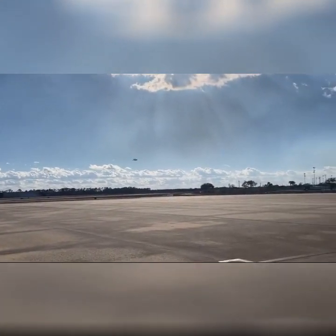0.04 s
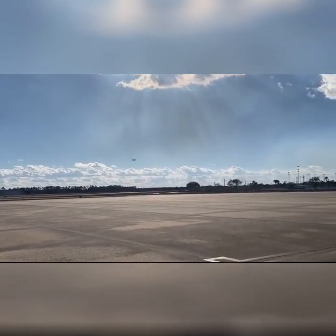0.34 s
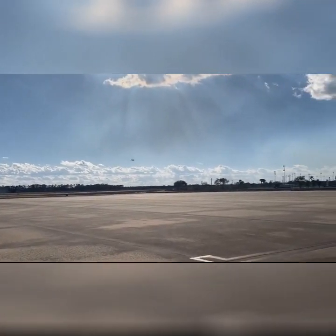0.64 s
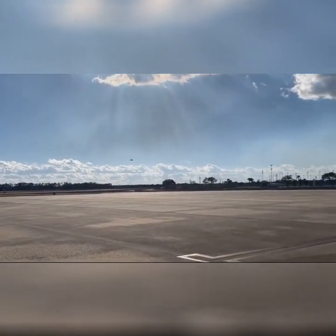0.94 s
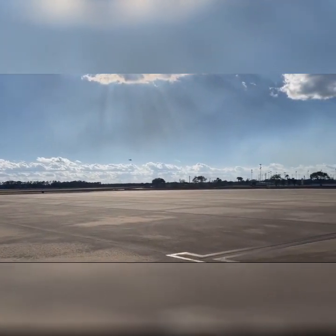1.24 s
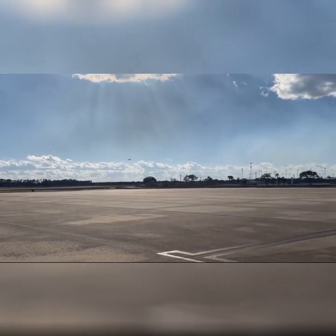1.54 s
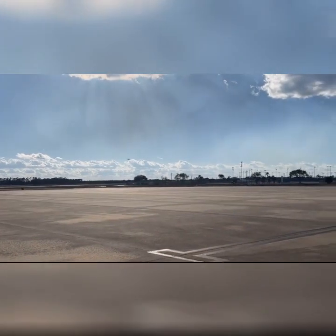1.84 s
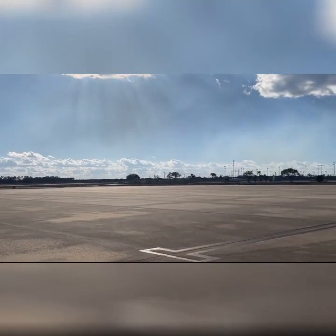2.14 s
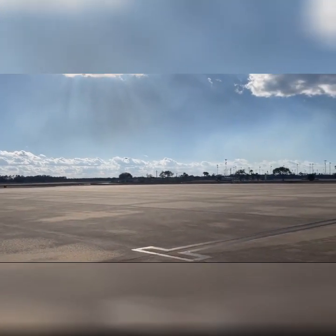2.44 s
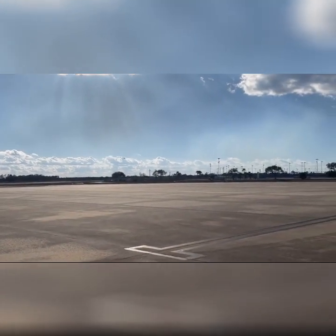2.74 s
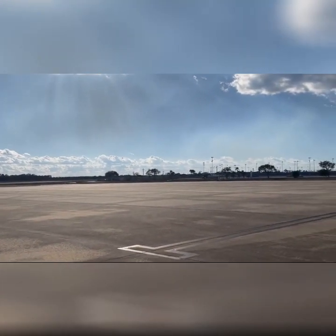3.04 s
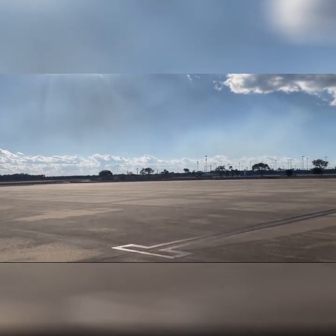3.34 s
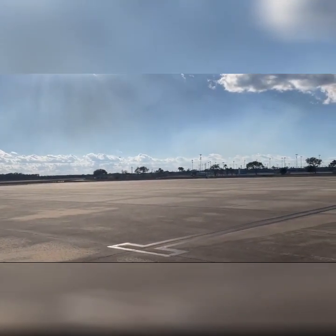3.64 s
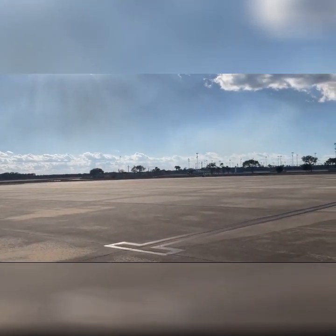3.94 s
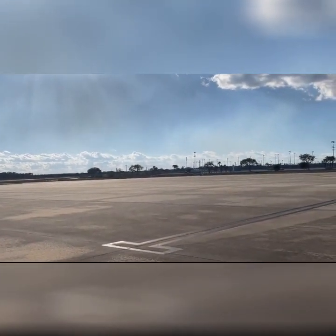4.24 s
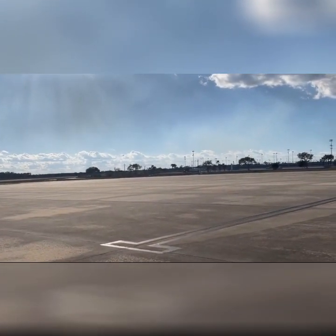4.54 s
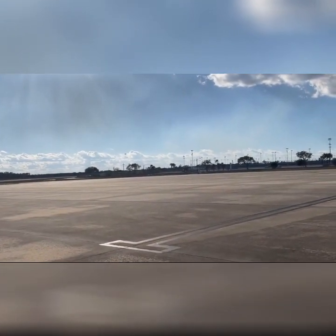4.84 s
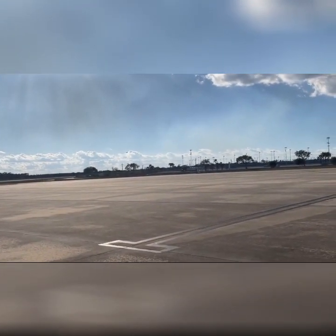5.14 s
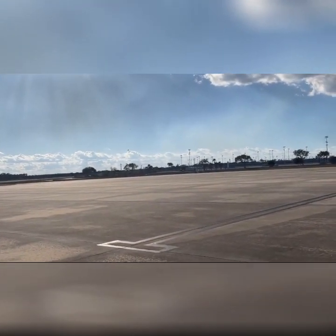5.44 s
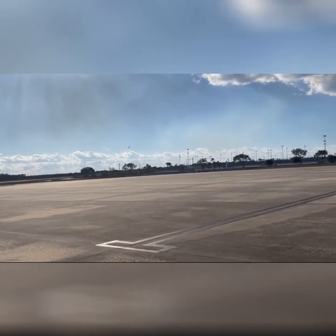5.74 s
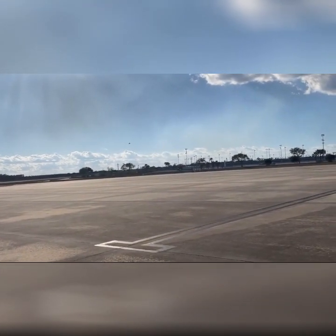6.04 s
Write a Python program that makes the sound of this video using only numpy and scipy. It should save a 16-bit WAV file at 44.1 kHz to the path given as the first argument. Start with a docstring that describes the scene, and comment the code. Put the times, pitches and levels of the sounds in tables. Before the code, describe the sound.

A jet fighter climbs away from an open airfield. Its exhaust makes a deep, throbbing boom and rumble, topped by rasping, tearing noise and sharp crackles that arrive in gusts. Brief hollow howls surface in the roar. After the first couple of seconds the crackle thins and the sound grows duller, while the low boom carries on. It is heard in stereo from the concrete apron.

```python
"""On the open concrete apron of an airfield, a jet fighter is heard climbing away.
Big swirls of air (eddies) in its exhaust boom, rumble and roar. Its pressure waves steepen into
shocks, sudden jumps in pressure that rasp, tear and crackle in gusts. Brief hollow howls stand out.
The air swallows more treble as the jet draws away, and the echo off the concrete cancels some
pitches, cutting wandering notches into the sound."""
import sys
import numpy as np
from scipy import signal
from scipy.fft import rfft, irfft
from scipy.io import wavfile
from scipy.ndimage import uniform_filter1d

SR = 44100
rng = np.random.default_rng(int(sys.argv[2]) if len(sys.argv) > 2 else 0)


def output_pcm(signal):
    """Save a mono or channel-first signal as 16-bit PCM at the path in sys.argv[1].

    Samples are clipped to [-1, 1] before scaling.
    """
    pcm = np.clip(np.atleast_2d(signal).T, -1, 1) * 32767
    wavfile.write(sys.argv[1], SR, np.round(pcm).astype(np.int16))


N = 273420
TIME = np.arange(N) / SR

# gusts that carry the shocks to the listener, and lulls that hold them back:
# (start [s], end [s], rasp [dB], tear [dB], crackle [dB])
GUSTS = [(-0.04, 0.06, 6.5, 3.5, 7), (0.06, 0.17, 1.5, 1.5, 4), (0.2, 0.3, 2, -4, 0.5),
         (0.33, 0.39, 11, 4, 8), (0.41, 0.5, 2, -3, 11), (0.53, 0.66, 2, 1, 5), (0.83, 0.99, 13, 8.5, 7.5),
         (1.0, 1.11, 10, 2.5, 5), (1.27, 1.46, 13, 8.5, 9), (1.36, 1.44, 2, -4, 7.5),
         (1.48, 1.67, 5.5, 4, 4), (1.75, 2.14, -3.5, 0, 1.5), (2.18, 2.24, 4, 5.5, 12.5),
         (2.33, 2.62, 3.5, 3, 3), (3.24, 3.4, 1, 4, 1), (3.42, 3.59, 4.5, 6, -2),
         (3.68, 3.96, -1, 5.5, -4.5), (4.05, 4.36, 0.5, -2.5, 1.5), (4.45, 4.59, 1.5, 5.5, -2.5),
         (5.03, 5.12, 5, 4, -10.5), (5.15, 6.3, 0.5, 0.5, -2), (5.57, 5.62, 10, -3.5, 6),
         (5.88, 6.04, 6.5, 0.5, 3)]
GUST_EDGE_S = 0.024  # how gradually a gust comes and goes
# tone colour of a steep shock: (pitch [Hz], level [dB])
SHOCK_COLOUR = [(150, -8.5), (600, 3), (1100, -2), (2000, -0.5), (3500, 0.5), (5000, -4.5), (7000, -6),
                (9000, -8), (12000, -10), (14000, -18.5), (16000, -32.5)]
SHOCK_BAND_HZ = (3500, 12000)


def amp(db):
    """Turns decibels into a gain, the number a sound is multiplied by."""
    return 10 ** (np.asarray(db) / 20)


def over_pitch(points, hz):
    """Reads a (pitch, value) table at the pitches hz, as a column."""
    pitch, value = np.transpose(points)
    return np.interp(np.log(hz + 1), np.log(pitch + 1), value)[:, None]


def local_rms(x, span_s):
    """The average strength (rms) of x around each moment."""
    width = max(int(span_s * SR), 2)
    return np.sqrt(abs(uniform_filter1d(uniform_filter1d(x ** 2, width), width)) + 1e-18)


def band(x, low_hz, high_hz):
    """The part of x between two pitches."""
    hz = np.fft.rfftfreq(N, 1 / SR)
    return irfft(rfft(x) * ((hz > low_hz) & (hz < high_hz)), N)


def held(s, start, end, edge_s):
    """A smooth curve over the times s that rises at start and falls at end."""
    return (np.tanh((s - start) / edge_s) - np.tanh((s - end) / edge_s)) / 2


def lift(surges, edge_s, s, column):
    """Decibels that a table of surges adds at the times s."""
    return sum(row[column] * held(s, row[0], row[1], edge_s) for row in surges)


def receding(near_db, fade_db, doubling_s=2.206):
    """Gain that drops by fade_db each time the distance doubles; the jet leaves at a steady speed."""
    return amp(near_db - fade_db * np.log2(1 + TIME / doubling_s))


def air_loss_db(hz, s):
    """The air swallows treble: more from far away, less in a gust; the highest pitches die fastest."""
    khz = hz[:, None] / 1000
    clearing = 0.28 * lift(GUSTS, GUST_EDGE_S, s, column=4)
    db_per_khz = np.maximum(3 + 1.0229 * s - clearing, 0)
    return khz * (db_per_khz + .025 * khz * s)


def ground_echo(hz, s, amount, blur_hz=4400):
    """The echo off the concrete cuts notches; it follows closer as the jet sinks to the horizon."""
    # the bounce off the ground: (time [s], delay [s], relative strength [0-1])
    bounces = [(0, 0.00094, 0.4), (.75, 0.00079, 0.43), (1.4, 0.001, 0.5), (2.2, 0.0011, 0.3),
               (2.6, 0.00094, 0.1), (2.85, 0.00083, 0.1), (3.5, .00077, 0.4), (3.95, 0.00068, 0.4),
               (4.5, 0.00044, 0), (6.2, 0.00024, 0.3)]
    times, delays, strengths = np.transpose(bounces)
    bounce = np.clip(amount * np.interp(s, times, strengths), 0, .95)
    bounce = bounce * np.exp(-hz[:, None] / blur_hz)  # churning air blurs the high notches
    return 1 + bounce * np.exp(-2j * np.pi * hz[:, None] * np.interp(s, times, delays))


def microphones(hz):
    """Gains of the left and right microphones, for direct sound and for sound scattered around them."""
    # how alike the two sides are: (pitch [Hz], likeness [0-1])
    likeness = [(60, .995), (140, .97), (330, .91), (520, .66), (800, .62), (1200, .8), (1800, .93),
                (3000, .95), (5000, .88), (7000, .65), (9000, .75), (15000, .6)]
    # how much louder the left is: (pitch [Hz], left minus right [dB])
    balance = [(60, .5), (340, .6), (420, 1.8), (700, 1.7), (900, 3.4), (1600, 2.8), (2400, .2), (15000, 0)]
    # how far the left wave runs ahead: (pitch [Hz], lead [radians])
    lead = [(60, 0), (300, .1), (440, .26), (540, 0), (860, .5), (1400, .35), (1900, .08), (3000, .55),
            (5200, .5), (5800, -1.3), (6700, -.6), (7700, -2.4), (10200, -3.8), (12500, -5.7)]
    same = np.clip(over_pitch(likeness, hz), 0, 1)
    side = np.array([1, -1])[:, None, None]
    gain = amp(side * over_pitch(balance, hz) / 2) * np.exp(.5j * side * over_pitch(lead, hz))
    return gain * np.sqrt((1 + same) / 2), gain * side * np.sqrt((1 - same) / 2)


def split_pitches(pair, size):
    """Cuts sound into short slices of size samples: gives their pitches, times and contents."""
    return signal.stft(pair, SR, nperseg=size, noverlap=size * 3 // 4)


def to_stereo(slices, gain, hz, size):
    """Joins the slices of a (direct, scattered) pair into left and right sound."""
    direct, scattered = microphones(hz)
    heard = gain * (direct * slices[0] + scattered * slices[1])
    return signal.istft(heard, SR, nperseg=size, noverlap=size * 3 // 4)[1][:, :N]


def arrive(pair, colour, band_hz, air=0, echo=0, patchy_db=0, patch_s=.22, size=512):
    """Carries a (direct, scattered) pair through air and ground echo to the microphones."""
    hz, s, slices = split_pitches(pair, size)
    gain = amp(over_pitch(colour, hz) - air * air_loss_db(hz, s)) * ground_echo(hz, s, echo)
    # churning air focuses the sound into drifting patches of time and pitch
    patch = np.outer(np.hanning(7), np.hanning(max(int(patch_s / s[1]), 3)))
    patches = signal.fftconvolve(rng.standard_normal(gain.shape), patch, "same")
    gain = gain * amp(patchy_db * patches / patches.std())
    # keep the gain inside band_hz steady, so that only the tone colour changes
    direct, _ = microphones(hz)
    inside = (hz > band_hz[0]) & (hz < band_hz[1])
    band_power = (abs(gain * direct.mean(0))[inside] ** 2).sum(0) / len(hz)
    return to_stereo(slices, gain / np.sqrt(band_power + 1e-30), hz, size)


def eddies(pair, colour, band_hz, span_s, echo=0, patchy_db=0):
    """The deep noise of swirling air, held at an even strength inside band_hz."""
    noise = arrive(pair, colour, band_hz, echo=echo, patchy_db=patchy_db, size=4096)
    return noise / local_rms(band(noise.mean(0), *band_hz), span_s)


def swelling(column, edge_s=0.22):
    """Gain for the slow rise and fall of one deep sound."""
    # swells and lulls of the exhaust: (start [s], end [s], boom [dB], rumble [dB], roar [dB])
    swells = [(.2, .55, 5.5, -1, -0.5), (.65, 1.1, 0, 1.5, 0.5), (1.2, 1.5, 4.5, 4, 4),
              (2.35, 3.1, -3, 4, -6.5), (3.49, 4.1, -1, 5.5, 7), (4.2, 4.9, 1.5, 0, 1.5),
              (4.95, 5.25, 3, 2, 0), (5.55, 6.2, -4.5, 4.5, 9.5)]
    return amp(lift(swells, edge_s, TIME, column))


def throbbing(column, half_length_s=0.034):
    """Gain for the short throbs and dips in the boom or the rumble."""
    # short throbs and dips: (time [s], boom [dB], rumble [dB])
    throbs = [(.14, -8, .5), (.56, 0.5, -2.5), (.74, 4, 0.5), (1.58, -5, 0), (1.7, -1, 0), (1.85, 5, 2.5),
              (2.05, -3.5, 4), (2.18, -3, 1), (2.35, -1, 2.5), (2.5, 5.5, 0), (3.22, 4.5, -1.5),
              (3.5, 5, 2), (4.15, 0, -0.5), (4.7, -3, -4), (5.03, 0.5, 2), (5.22, -6, -2.5), (5.8, -3, 0.5)]
    return amp(sum(row[column] * np.exp(-.5 * ((TIME - row[0]) / half_length_s) ** 2) for row in throbs))


def boom():
    """The largest eddies, far behind the jet, make a boom that does not fade with distance."""
    # tone colour of the largest eddies: (pitch [Hz], level [dB])
    colour = [(15, -46.5), (28, -23.5), (40, -13.5), (50, -2), (68, 2), (88, 0.5), (110, -4.5), (150, -24),
              (300, -58.5), (1000, -100)]
    noise = eddies(rng.standard_normal((2, N)), colour, band_hz=(35, 100), span_s=0.14)
    return noise * receding(near_db=-25.5, fade_db=-0.33) * swelling(column=2) * throbbing(column=1)


def rumble():
    """Large eddies make the throbbing body of the exhaust sound."""
    # tone colour of the large eddies: (pitch [Hz], level [dB])
    colour = [(30, -56.5), (70, -17.5), (100, -3), (135, 2.5), (195, -1), (250, -11), (310, -16),
              (420, -28), (700, -47), (1500, -87), (8000, -125)]
    noise = eddies(rng.standard_normal((2, N)), colour, band_hz=(100, 240), span_s=0.12, patchy_db=2.0)
    return noise * receding(near_db=-17.0, fade_db=7.0) * swelling(column=3) * throbbing(column=2)


def shock_train(near_per_s, far_per_s, spread_db, smooth_share):
    """Pressure jumps of uneven size mixed with smooth noise; fewer survive from far away."""
    per_s = near_per_s * (far_per_s / near_per_s) ** (TIME / TIME[-1])
    sizes = amp(spread_db * np.minimum(rng.exponential(1, N), 2.8))
    train = sizes * (rng.random(N) < per_s / SR)
    train = (train - train.mean()) / local_rms(train, 0.041)
    return np.sqrt(1 - smooth_share) * train + np.sqrt(smooth_share) * rng.standard_normal(N)


def pressure_waves(flutter_db=0.42):
    """The exhaust's steepened waves as a (direct, scattered) pair, wavering in the churning air."""
    fronts = shock_train(near_per_s=1200, far_per_s=900, spread_db=4.2, smooth_share=.36)
    pair = np.array([fronts, rng.standard_normal(N)])
    drift = band(rng.standard_normal(N), low_hz=6.1, high_hz=21.4)
    return pair * amp(flutter_db * drift / drift.std())


def roar(waves):
    """The slow swing of the pressure waves makes a roar that swells now and then."""
    # tone colour of the slow swing: (pitch [Hz], level [dB])
    colour = [(60, -26), (150, -9.5), (230, 5), (320, 1.5), (430, -3.5), (560, -8.5), (750, -20),
              (1100, -48), (2000, -59), (4000, -96), (12000, -125)]
    noise = eddies(waves, colour, band_hz=(260, 560), span_s=0.22, echo=1.0, patchy_db=3.0)
    return noise * receding(near_db=-29.0, fade_db=2.5) * swelling(column=4)


def howl(waves, half_width_hz=100, size=1024):
    """Brief hollow, gliding howls where narrow bands of the exhaust noise stand out."""
    # hollow howls: (start [s], end [s], first pitch [Hz], last pitch [Hz], level [dB])
    howls = [(-.04, 0.064, 1360, 1330, -34.5), (0, .12, 2500, 2450, -46.5), (0.505, .78, 1160, 1130, -43.5),
             (1.346, 1.442, 2600, 2550, -43.5), (1.66, 2.006, 710, 643, -49), (2.192, 2.35, 1000, 920, -42),
             (2.43, 2.626, 1810, 1870, -54.5), (2.496, 2.637, 840, 1120, -40),
             (2.507, 2.593, 2360, 2350, -49), (2.848, 3.296, 500, 528, -45.5),
             (2.947, 3.08, 1040, 1060, -48), (3.327, 3.416, 1440, 1390, -43.5),
             (3.443, 3.557, 1290, 1330, -41.5), (3.457, 3.582, 2480, 2530, -54),
             (3.583, 3.98, 342, 350, -31.5), (3.763, 4.029, 2410, 1300, -50),
             (4.478, 4.604, 1960, 1870, -54), (5.213, 5.336, 1024, 947, -49), (5.815, 6.1, 570, 620, -46)]
    hz, s, slices = split_pitches(waves, size)
    gain = 0
    for start, end, from_hz, to_hz, db in howls:
        centre_hz = np.interp(s, [start, end], [from_hz, to_hz])
        peak = np.exp(-.5 * ((hz[:, None] - centre_hz) / half_width_hz) ** 2)
        gain = gain + amp(db) * held(s, start, end, edge_s=0.02) * peak / np.sqrt((peak ** 2).mean(0))
    return to_stereo(slices, gain, hz, size)


def gusting(column):
    """Gain that the gusts give to one bright sound."""
    return amp(lift(GUSTS, GUST_EDGE_S, TIME, column))


def rasp(waves):
    """Rounded wave fronts merge into a rasp, made hollow by the ground echo."""
    # tone colour of the rounded fronts: (pitch [Hz], level [dB])
    colour = [(150, -25.5), (480, -12), (710, 4.5), (950, 3), (1250, 0.5), (1550, -11), (2000, -20.5),
              (3000, -40), (6000, -69.5)]
    gusty = waves * receding(near_db=-35.0, fade_db=7.5) * gusting(column=2)
    return arrive(gusty, colour, band_hz=(720, 1550), air=.6, echo=1.1, patchy_db=1.7)


def tear(waves):
    """Steeper fronts make a sound like tearing cloth."""
    # tone colour of the steeper fronts: (pitch [Hz], level [dB])
    colour = [(400, -38.5), (900, -21.5), (1400, -4), (1800, -1), (2450, -1), (3200, -4), (4000, -8),
              (5000, -10.5), (8000, -20.5), (16000, -50.5)]
    gusty = waves * receding(near_db=-42.0, fade_db=7.0) * gusting(column=3)
    return arrive(gusty, colour, band_hz=(1600, 3400), air=.74, echo=1.05, patchy_db=1.5)


def with_scatter(train, scatter_s):
    """Pairs a train of shocks with the short smear of noise that each one scatters."""
    return np.array([train, local_rms(train, scatter_s) * rng.standard_normal(N)])


def crackle():
    """Separate steep shocks snap in bursts; distance rounds them off."""
    train = shock_train(near_per_s=650, far_per_s=190, spread_db=5.7, smooth_share=.01)
    train = train * receding(near_db=-51.5, fade_db=16.0) * gusting(column=4)
    pair = with_scatter(train, scatter_s=0.00066)
    return arrive(pair, SHOCK_COLOUR, SHOCK_BAND_HZ, air=0.86, echo=0.24)


def hiss(db=-85.0):
    """The microphones make a faint, steady noise of their own."""
    # tone colour of the microphones' noise: (pitch [Hz], level [dB])
    colour = [(100, 2), (8000, -16), (11300, 5.5), (11950, 24), (12700, -11.5), (16000, -37.5)]
    gain = amp(over_pitch(colour, np.fft.rfftfreq(N, 1 / SR))[:, 0])
    noise = irfft(rfft(rng.standard_normal((2, N))) * gain, N)
    return amp(db) * noise / noise.std()


def strong_shocks():
    """One click for each of the strongest shocks."""
    # the strongest single shocks: (time [s], relative level [dB])
    shocks = [(0.0139, -29), (0.0273, -29), (0.0346, -27), (0.0455, -27), (0.0499, -25), (0.0751, -26.5),
              (0.0886, -26), (0.0955, -30), (0.3437, -35), (0.348, -27), (0.3615, -26), (0.3718, -22),
              (0.4006, -27), (0.4232, -29), (0.4274, -27), (0.47, -30), (0.479, -32), (0.5101, -27),
              (0.525, -32), (0.5574, -31), (0.6388, -29), (0.7332, -36), (0.7919, -34), (0.8085, -34),
              (0.8359, -33), (0.8533, -24.5), (0.858, -22), (0.8656, -25.0), (0.889, -28), (0.8988, -26.0),
              (0.9125, -21.5), (0.9154, -27), (0.9185, -22), (0.9249, -25), (0.9273, -20.5), (0.935, -21.5),
              (0.944, -23.5), (0.9492, -23), (0.9634, -24), (0.9753, -26.5), (0.9902, -31), (0.999, -28),
              (1.013, -25.5), (1.0356, -34), (1.0795, -34), (1.2767, -31), (1.2945, -34), (1.3193, -31),
              (1.3523, -27), (1.3669, -19), (1.3716, -23.5), (1.383, -21), (1.3867, -27), (1.3909, -17.5),
              (1.3951, -27), (1.4028, -19), (1.41, -20.5), (1.42, -28), (1.4344, -18), (1.4484, -32),
              (1.4697, -36), (1.479, -34), (1.4858, -34), (1.5076, -35), (1.616, -34), (2.0316, -39),
              (2.1904, -42), (2.2027, -36), (2.2065, -30), (2.2192, -30.5), (2.2283, -35), (2.381, -44),
              (2.3896, -41), (2.4041, -42), (2.4205, -37), (2.4427, -36), (2.4755, -40.0), (2.4912, -36),
              (2.5005, -31), (2.5132, -37), (2.5216, -42), (2.5254, -44), (2.5405, -37), (2.8377, -45),
              (2.8972, -46), (3.2682, -41.5), (3.2934, -46), (3.3089, -44), (3.3813, -45), (3.429, -43),
              (3.444, -41), (3.4894, -38), (3.502, -40), (3.5462, -42), (3.5824, -37.5), (3.6062, -40),
              (3.6789, -40.5), (3.715, -43), (3.7377, -42), (3.743, -39), (3.748, -40), (3.7612, -40),
              (3.7672, -39), (3.7704, -43), (3.7835, -45), (3.8038, -39), (3.8336, -44), (3.8379, -42),
              (3.8682, -43.5), (3.9258, -42), (3.9571, -47), (4.3807, -48), (4.419, -48), (4.4339, -47),
              (4.46, -47), (4.4695, -46), (4.5207, -40.5), (4.548, -42), (4.5543, -46), (4.5787, -47),
              (4.614, -50), (4.8455, -52), (5.0437, -52), (5.0559, -51), (5.1152, -50), (5.2483, -53),
              (5.2556, -54), (5.4429, -54), (5.5852, -42.5), (5.5924, -51), (5.646, -52), (5.7318, -50),
              (5.7824, -49), (5.8367, -43.5), (5.8764, -47), (5.8934, -45.5), (5.948, -45), (5.976, -43.5),
              (5.9802, -49), (6.0282, -44), (6.0402, -43)]
    s, db = np.transpose(shocks)
    samples = np.clip(np.round(s * SR).astype(int), 0, N - 1)
    return np.bincount(samples, amp(db), N)


def with_wake(train, wake_db, wake_s):
    """Follows each shock with a quickly dying tail of wrinkled wave fronts."""
    decay = np.exp(-1 / (wake_s * SR))
    power = signal.lfilter([1 - decay], [1, -decay], train ** 2 + 1e-18)
    return train + amp(wake_db) * np.sqrt(power) * rng.standard_normal(N)


def cracks(gain_db=8.2):
    """The strongest shocks keep steepening on their way and stay brightest; each has its own colour."""
    train = with_wake(amp(gain_db) * strong_shocks(), wake_db=-6, wake_s=.003)
    pair = with_scatter(train, scatter_s=0.0008)
    return arrive(pair, SHOCK_COLOUR, SHOCK_BAND_HZ, air=0.72, echo=0.5, patchy_db=1.8, patch_s=.018)


def thumps(gain_db=18.0, band_hz=(130, 300), top_hz=1200):
    """Behind each strong shock comes the low, rounded push of its wave, the same near and far."""
    equal_clicks = np.sign(strong_shocks())
    push = signal.sosfilt(signal.butter(2, band_hz, "bandpass", fs=SR, output="sos"), equal_clicks)
    return amp(gain_db) * signal.sosfilt(signal.butter(2, top_hz, fs=SR, output="sos"), push)


def scene():
    """The exhaust, from its largest eddies to its sharpest shocks."""
    waves = pressure_waves()  # one stream drives the roar, howl, rasp and tear together
    return (boom() + rumble() + roar(waves) + howl(waves) + rasp(waves) + tear(waves)
            + crackle() + cracks() + thumps())


def record(dry):
    """The microphones lose the deepest bass, add their hiss and cut off the highest treble."""
    bass_cut_hz, treble_cut_hz = 33., 15750
    hz = np.fft.rfftfreq(N, 1 / SR)
    bass_cut = hz ** 4 / np.sqrt(hz ** 8 + bass_cut_hz ** 8)
    heard = irfft(rfft(dry) * bass_cut, N) + hiss()
    treble_cut = signal.firwin(511, treble_cut_hz, window=("kaiser", 9), fs=SR)
    return signal.oaconvolve(heard, treble_cut[None], "same")


dry = scene()
out = record(dry)
output_pcm(out)
```